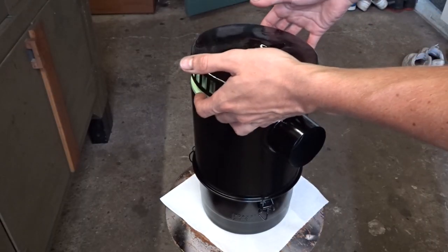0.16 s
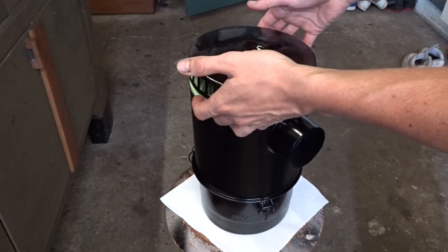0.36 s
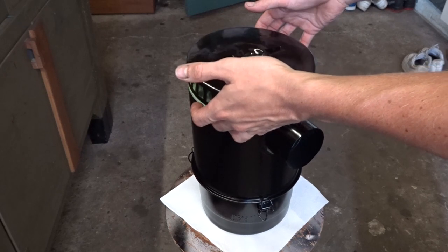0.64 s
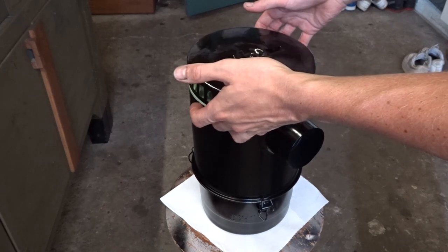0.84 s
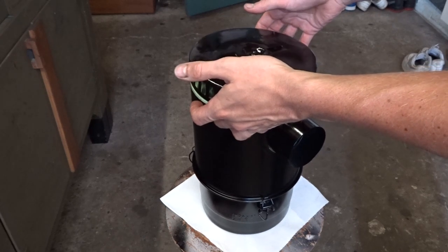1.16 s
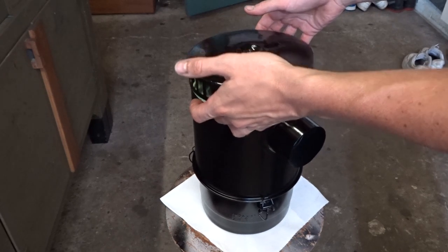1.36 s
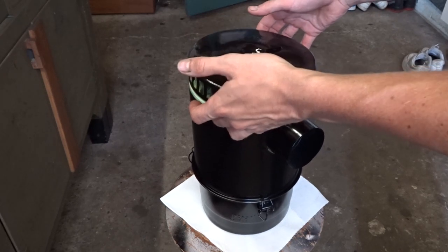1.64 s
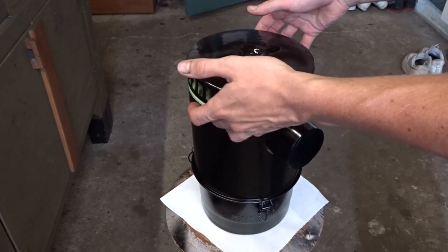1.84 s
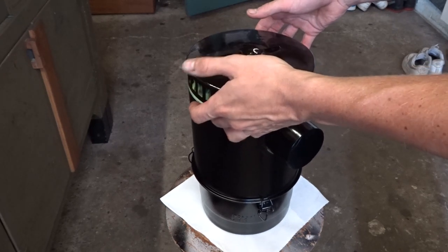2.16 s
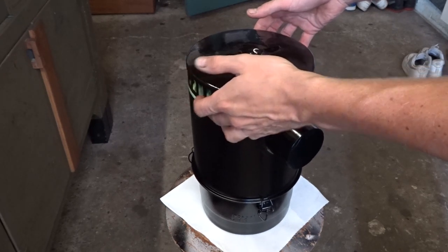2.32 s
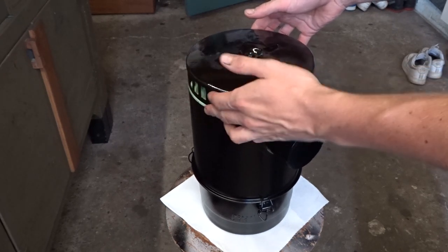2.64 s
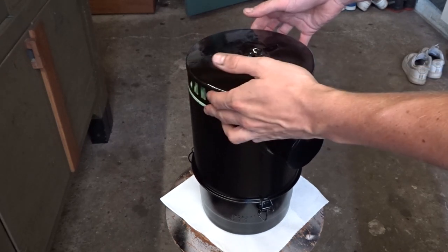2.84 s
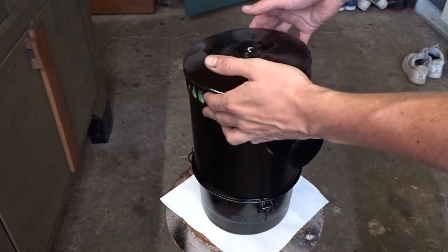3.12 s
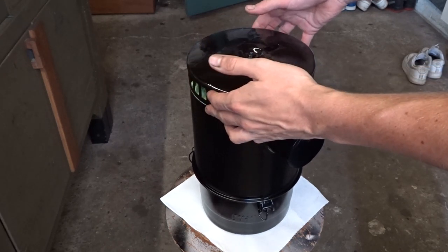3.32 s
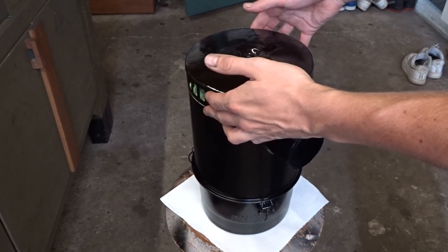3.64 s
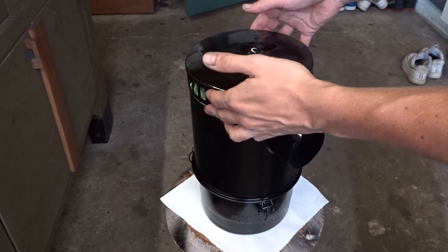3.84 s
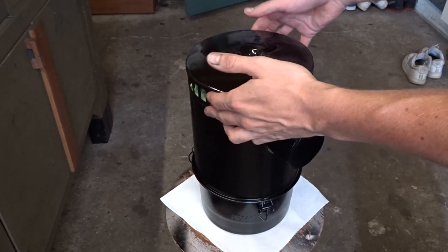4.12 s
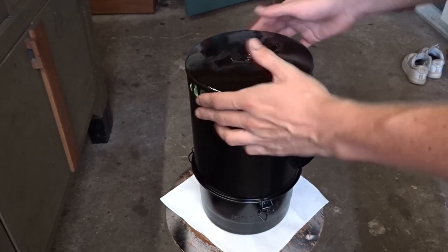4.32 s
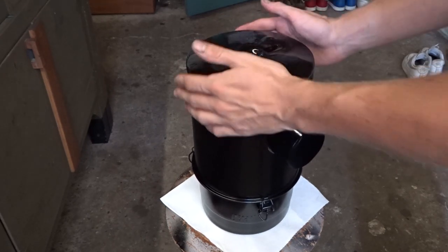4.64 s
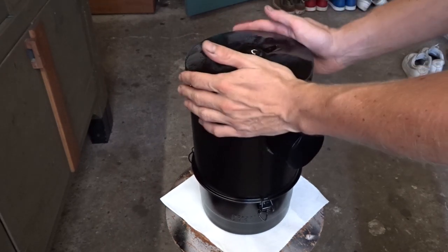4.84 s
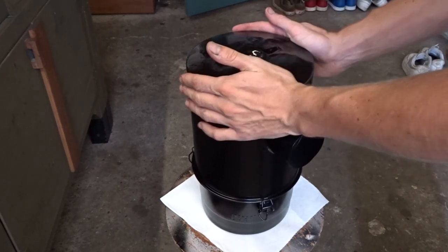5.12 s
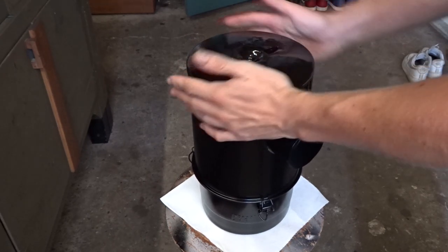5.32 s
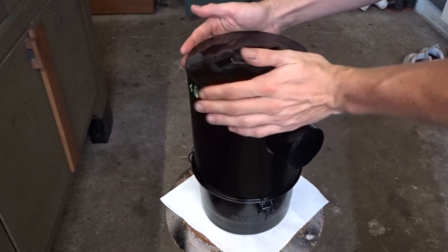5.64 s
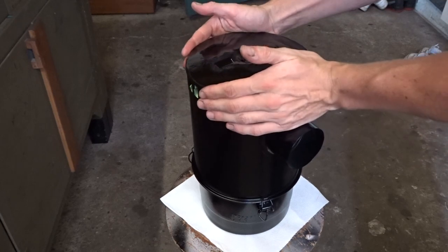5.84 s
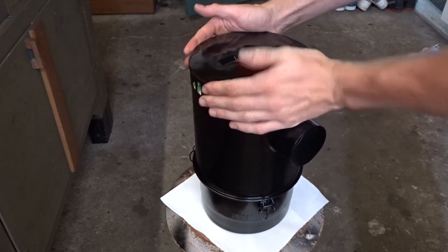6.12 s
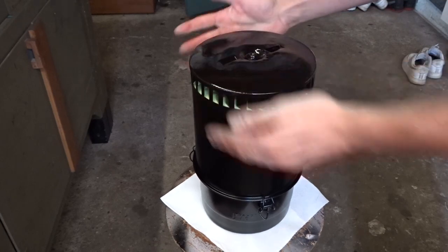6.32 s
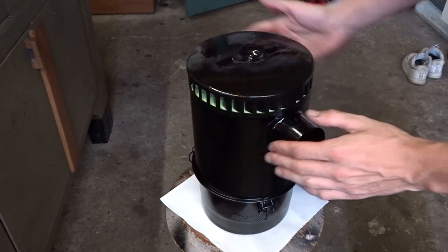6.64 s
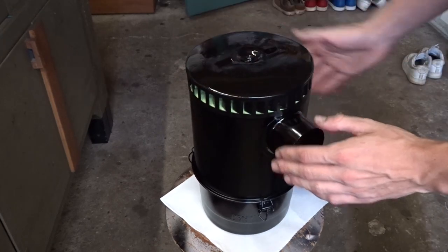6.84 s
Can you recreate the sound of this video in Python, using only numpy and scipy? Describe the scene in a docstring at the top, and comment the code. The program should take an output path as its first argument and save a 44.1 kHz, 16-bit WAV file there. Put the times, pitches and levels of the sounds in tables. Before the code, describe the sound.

In a small workshop, close in stereo, a steel lid is pressed onto a canister: one hard clank, then a louder double clang with a singing, quickly smothered ring. A car's roar outside fades away. A softer clank and small clicks follow, then light fingertip taps, a palm pat and skin rubbing on painted steel, over hiss and a faint clock tick.

```python
"""Small workshop: two hands press a sheet-steel lid onto a steel canister, with loud clanks and fainter late ones.
Clanks sum decaying modes, shell noise and a stool thump; the flexing lid adds swelling rough tones and pings.
Fingers tap and skin slides over the paint: shaped noise. A wall clock ticks about once a second, as noise bands.
Outside, a car's roar surges and fades, over room hiss and a ventilation drone.
The recorder's gain control ducks peaks above full scale and recovers slowly."""
import sys
import numpy as np
from scipy import signal
from scipy.fft import rfft, irfft, next_fast_len
from scipy.io import wavfile
from scipy.ndimage import uniform_filter1d, minimum_filter1d

SR = 44100
rng = np.random.default_rng(int(sys.argv[2]) if len(sys.argv) > 2 else 0)


def store_wav(level_fs):
    """Save 16-bit WAV to argv[1]."""
    pcm = np.round(np.clip(np.atleast_2d(level_fs), -1, 1) * 32767)
    wavfile.write(sys.argv[1], SR, pcm.T.astype(np.int16))


N = 307369
T = np.arange(N) / SR


def from_db(db):
    """Decibels to gain."""
    return 10 ** (np.asarray(db) / 20)


def rms_one(x):
    """Scale to unit power."""
    return x / np.sqrt(np.mean(x ** 2) + 1e-20)


def at_hz(points, hz):
    """Read a table on a log-frequency axis."""
    points = np.array(points)
    return np.interp(np.log(np.maximum(hz, 1)), np.log(points[:, 0]), points[:, 1])


def add(out, start_s, sound):
    """Mix a sound in at start_s, trimmed to the scene."""
    at = round(start_s * SR)
    out[:, max(at, 0):at + sound.shape[-1]] += sound[..., max(-at, 0):N - at]


def low_pass(x, hz, order=2):
    """Causal low-pass."""
    return signal.sosfilt(signal.butter(order, min(hz, .45 * SR), fs=SR, output="sos"), x)


def radiate(x, hz):
    """High-pass: a small body radiates little bass."""
    return signal.sosfilt(signal.butter(2, hz, "high", fs=SR, output="sos"), x)


def hump(hz, width_hz):
    """Gain curve of one resonance."""
    return lambda f: 1 / np.sqrt(1 + ((f * f - hz * hz) / (f * width_hz + 1e-9)) ** 2)


def wobble(size, hz):
    """Low-passed random motion of unit power, cut-off hz."""
    return rms_one(low_pass(rng.standard_normal(size), hz))


def stroke(t, rise_s, fall_s):
    """Envelope that swells up to time zero and then dies away."""
    return np.exp(-.5 * (np.minimum(t, 0) / rise_s) ** 2 - np.maximum(t, 0) / fall_s)


# left-right likeness of diffuse and of near sounds: freq_hz, likeness (0-1)
DIFFUSE_LIKENESS = [(50, .6), (300, 0.6), (1000, 0.4), (2500, 0), (4500, 0), (9000, 0)]
NEAR_LIKENESS = [(50, .7), (200, 1), (600, 0.8), (1500, 0.71), (2600, 0.65), (4500, 0.15), (8000, 0)]


def noise(size, colour, likeness):
    """Stereo noise of unit power with a given gain curve and left-right likeness."""
    padded = next_fast_len(size)
    f = np.arange(padded // 2 + 1) * SR / padded
    mid, side = rfft(rng.standard_normal((2, padded)))
    alike = np.clip(at_hz(likeness, f), 0, 1)
    both = np.sqrt(1 + alike) * mid + np.sqrt(1 - alike) * side * [[1], [-1]]
    return rms_one(irfft(both * colour(f), padded)[:, :size])


# surges of the car's roar: peak_s, level_db
CAR_SURGES = [(.2, 2), (.46, 4), (1.27, 2)]
SURGE_S = 0.074
CAR_DB, CAR_LEAVES_S, CAR_RECEDE_S = -42.5, 1.685, 0.29
CAR_FALLOFF = 0.98  # exponent of distance


def car_gain():
    """The roar surges a few times; from CAR_LEAVES_S it falls with distance."""
    distance = np.hypot(1, np.maximum(T - CAR_LEAVES_S, 0) / CAR_RECEDE_S)
    surges_db = sum(db * np.exp(-((T - s) / SURGE_S) ** 2) for s, db in CAR_SURGES)
    return from_db(CAR_DB + surges_db) / distance ** CAR_FALLOFF


# tyre roar spectrum: freq_hz, relative_level_db_per_hz
TYRE_SPECTRUM = [(35, -74), (60, -42), (128, -43.5), (315, -15.5), (349, -22), (387, -10), (547, -15),
                 (808, -5), (1030, 0.5), (1320, -6), (1590, -2.5), (1790, -10), (3670, -31), (8000, -50),
                 (10400, -68), (17600, -120)]


def tyre_roar(sway_db=-0.5, nearest_s=0.55, turn_s=.25, split_hz=1100):
    """Tyre noise, brighter as the car nears and duller as it leaves."""
    tyres = noise(N, lambda f: from_db(at_hz(TYRE_SPECTRUM, f)), NEAR_LIKENESS)
    dull = low_pass(tyres, split_hz, order=1)
    sway = from_db(sway_db * np.tanh((T - nearest_s) / turn_s))
    return car_gain() * (dull / sway + (tyres - dull) * sway)


def engine(level_db=-76, hz=160, passing_s=1.65, passage_s=0.22):
    """Narrow low noise from the car, strongest at passing_s."""
    hum = noise(N, lambda f: hump(hz, 50)(f) ** 2, NEAR_LIKENESS)
    return from_db(level_db) * hum / np.hypot(1, (T - passing_s) / passage_s)


# room hiss spectrum: freq_hz, relative_level_db_per_hz
AIR_SPECTRUM = [(15, -75.5), (25, -29.5), (85, -30), (122, -33.5), (156, -23.5), (227, -19.5), (281, -25.5),
                (313, -10.5), (389, -6.5), (567, -19), (1050, -11.5), (1450, -7.5), (2230, -6),
                (3440, -13.5), (6550, -16), (12000, -21.5), (15500, -27.5)]


def room_air(level_db=-55.0):
    """Steady coloured hiss of the room."""
    return from_db(level_db) * noise(N, lambda f: from_db(at_hz(AIR_SPECTRUM, f)), DIFFUSE_LIKENESS)


def ventilation(level_db=-71, hz=385):
    """Faint drone: steady noise through one resonance."""
    return from_db(level_db) * noise(N, lambda f: hump(hz, 70)(f) ** 2, NEAR_LIKENESS)


# canister modes: freq_hz, level_db (before focus), free_t60_s
CANISTER_MODES = [(491, -18, 0.55), (551.2, -4.5, 0.38), (660, -22, 0.74), (745, -15, 0.15),
                  (893, -15.5, 0.31), (990, -7.5, 0.51), (1088, -0.1, 0.42), (1143, -10, 0.3),
                  (1196, -20, 0.15), (1359, -19, 0.2), (1374, -21.5, 0.6), (1544, -12, 0.89),
                  (1510, -11.5, 0.39), (1640, -12, 0.47), (1774, -12, 0.45), (1816, -20, 0.38),
                  (1765, -28.5, 0.13), (2310, -17.5, .25), (2490, -9, 0.2), (2450, -26.5, 0.36),
                  (2366, -29.5, 0.24), (2780, -17.5, 0.069), (2870, -23, 0.15), (3176, -18, 0.2),
                  (3500, -32.5, .24), (3780, -31.5, .24), (4170, -22, 0.16), (5820, -36, .3)]


def damped_body(f, width_hz):
    """Gain curve of the canister's modes at one common width, with their levels left out."""
    return np.sqrt(sum(hump(hz, width_hz)(f) ** 2 for hz, db, t60 in CANISTER_MODES))


# skin sliding over the paint: peak_s, level_db, rise_s, centre_hz
RUBS = [(0.03, -55.5, 0.045, 4500), (5.021, -55, 0.058, 1550), (5.34, -55.5, .035, 1880),
        (5.905, -53, 0.014, 1920), (6.24, -48, 0.054, 1700), (6.772, -45, 0.032, 3800),
        (6.94, -56.5, 0.048, 1460)]
RUB_FALL_S = 0.084
GRIT_PER_S, GRIT_DB = 44, 6  # mean rate of catches; level against the stroke


def rubs(width=1.0, grain_db=1.5, grain_hz=200, grit_s=0.0035, damping_hz=40):
    """Skin sticks and slips in tiny grains under each stroke; random catches tick on the damped canister."""
    out, t = np.zeros((2, N)), T[:SR] - 1 / 4
    for peak_s, level_db, rise_s, hz in RUBS:
        grain = from_db(grain_db * wobble(len(t), grain_hz))
        slide = grain * noise(len(t), lambda f: hump(hz, width * hz)(f) ** 2, NEAR_LIKENESS)
        hits = (rng.random(len(t)) < GRIT_PER_S / SR) + 1e-18
        catches = signal.lfilter([1], [1, -np.exp(-1 / (grit_s * SR))], hits)
        body = noise(len(t), lambda f: hump(hz, width * hz)(f) * damped_body(f, damping_hz), NEAR_LIKENESS)
        rub = slide + from_db(GRIT_DB) * catches * body
        add(out, peak_s + t[0], from_db(level_db) * stroke(t, rise_s, RUB_FALL_S) * rub)
    return radiate(out, 250)


# clock case resonances: freq_hz, width_hz (before the 1.27 power), level_db, lateness_s
CLOCK_CASE = [(896, 45, -11, 0.022), (2120, 1600, -8.5, 0.0068), (2323, 160, -10.5, 0.0018),
              (3105, 130, -7, 0.0011), (4400, 740, -17.5, 0.0013), (5350, 360, -15, 0),
              (8000, 2800, -19.5, 0.00054)]
FIRST_TICK_S, TICK_PERIOD_S, TICK_DB = .629, .9987, -42


def clock(rise_s=0.014, fall_s=0.072, settle_s=0.087, settle_db=-9):
    """A distant tick, smeared by the room; the second hand settles just after each step."""
    out, t = np.zeros((2, N)), T[:SR * 2 // 3] - 1 / 20
    for tick_s in np.arange(FIRST_TICK_S, T[-1], TICK_PERIOD_S):
        for hz, width_hz, case_db, late_s in CLOCK_CASE:
            step = stroke(t - late_s, rise_s, fall_s)
            settle = stroke(t - late_s - settle_s, rise_s, fall_s)
            level = from_db(TICK_DB + case_db) * np.hypot(step, from_db(settle_db) * settle)
            case = noise(len(t), lambda f: hump(hz, width_hz)(f) ** 1.27, NEAR_LIKENESS)
            add(out, tick_s + t[0], level * case)
    return out


# dense small shell modes: freq_hz, relative_level_db_per_hz
CLATTER_SPECTRUM = [(100, -44.5), (300, -19.5), (430, -15.5), (520, -2), (620, -11.5), (800, -9), (1000, 0),
                    (1800, 3.5), (2080, -5.5), (2450, -4.5), (3000, -15.5), (3600, -15.5), (4300, -14),
                    (5000, -23), (6000, -17), (8000, -28.5), (15000, -40)]
# their free decay: freq_hz, t60_s
CLATTER_DECAY = [(150, 1), (500, 0.44), (1500, 0.46), (2700, 0.31), (7000, 0.51), (15000, 0.44)]


def shell_clatter(t, length, valley=0.4, cluster_hz=35):
    """Countless small modes crowd round the main ones: noise with a separate decay in each octave."""
    def colour(f):
        return from_db(at_hz(CLATTER_SPECTRUM, f)) * np.hypot(valley, damped_body(f, cluster_hz))

    spectrum = rfft(noise(len(t), colour, NEAR_LIKENESS))
    f = np.arange(spectrum.shape[1]) * SR / len(t)
    octave = np.log2(np.clip(f, 125, 16000) / 125)
    out = 0
    for k in range(8):
        band = irfft(spectrum * np.maximum(1 - abs(octave - k), 0), len(t))
        t60_s = at_hz(CLATTER_DECAY, 125 * 2 ** k) * length
        out = out + band * from_db(-60 * t / t60_s)
    return out


EDGE_RING_DB, CENTRE_RING_DB = -18.5, 4.5  # ringing modes against the clatter
EDGE_FOCUS, CENTRE_FOCUS = .6, 1.5  # a central blow favours the strongest modes
CHOKE_AFTER_S, CHOKE_DB_PER_S = 0.15, 76  # the palms close on the steel and smother it
EAR_PHASE_RAD = .18  # at 1400 Hz, before the random skew


def mode_ring(t, clatter_db, centred, length, scatter_db=1.24, grip=1.43):
    """Decaying sine modes; the hands press ever more firmly, so the ring dies faster as it goes."""
    hz, mode_db, t60_s = np.transpose(CANISTER_MODES)[:, :, None]
    signs = (-1) ** np.arange(len(CANISTER_MODES))[:, None]
    ring_db = clatter_db + EDGE_RING_DB + centred * (CENTRE_RING_DB - EDGE_RING_DB)
    focus = EDGE_FOCUS + centred * (CENTRE_FOCUS - EDGE_FOCUS)
    strength, skew = rng.standard_normal((2, len(CANISTER_MODES), 1))
    start_db = ring_db + focus * mode_db + scatter_db * strength
    choke_db = CHOKE_DB_PER_S * np.maximum(t - CHOKE_AFTER_S, 0)
    fade = signs * from_db(start_db - 60 * (t / (t60_s * length)) ** grip - choke_db)
    # higher modes reach the two ears further out of step
    phase = EAR_PHASE_RAD * np.tanh(skew) * np.sqrt(hz / 1400)
    return np.array([(fade * np.sin(2 * np.pi * hz * t + side * phase)).sum(0) for side in (1, -1)])


def stool_thump(t, thump_hz=158, thump_s=0.1):
    """The stool beneath answers with low noise: a thump and a deeper shudder."""
    thump = noise(len(t), lambda f: hump(thump_hz, 40)(f) ** 2, NEAR_LIKENESS) * np.exp(-t / thump_s)
    shudder = from_db(-6) * noise(len(t), hump(45, 70), DIFFUSE_LIKENESS) * np.exp(-t / 0.054)
    return (thump + shudder) * -np.expm1(-t / 0.045)


# lid snaps on the rim: start_s, level_db, centredness (0 edge, 1 middle), contact_cutoff_hz,
# ring_length (multiplies the free t60)
CLANKS = [(0.6291, -14, 0.71, 2700, 0.45), (0.640, -22.5, .4, 2500, 1.3), (1.343, -11.5, 0.67, 8076, 0.61),
          (1.366, -11.5, 0.44, 7000, 0.76), (1.433, -10.5, 0.12, 3000, 0.94),
          (1.673, -23.5, 0.31, 800, .35), (3.158, -19, 0.89, 3800, 1.14), (3.216, -30.5, 0.66, 2330, 0.98),
          (3.322, -32.5, 0.085, 800, .35), (3.8135, -35.5, .3, 1210, 0.58), (3.920, -32.5, 0, 9100, 0.91),
          (4.020, -41, 0, 2660, 1.02)]
THUMP_DB = -47.5  # stool against the clatter
RIM_HZ, RIM_DB, RIM_T60_S, SOFT_CONTACT_HZ = 682, -5.5, 0.15, 800  # soft edge blows wake a low rim mode
EDGE_BASS_HZ, CENTRE_BASS_HZ = 910, 229  # an edge blow moves less steel, so its bass ends higher up


def clanks(crack_db=-19, crack_s=0.0045):
    """Each snap rings modes and rim, rattles the shell and thumps the stool; where it lands sets the balance."""
    out, t = np.zeros((2, N)), T[:SR * 4 // 7]
    for start_s, clatter_db, centred, contact_hz, length in CLANKS:
        ring = mode_ring(t, clatter_db, centred, length)
        crack = from_db(crack_db) * noise(len(t), hump(3500, 4000), NEAR_LIKENESS) * np.exp(-t / crack_s)
        rattle = from_db(clatter_db) * (shell_clatter(t, length) + crack)
        steel = (ring + rattle) * -np.expm1(-t / 0.00029)
        stool = from_db(clatter_db + THUMP_DB) * stool_thump(t)
        rim_gain = (1 - centred) * SOFT_CONTACT_HZ / contact_hz
        rim_fade = from_db(clatter_db + RIM_DB - 60 * t / RIM_T60_S)
        rim = rim_gain * rim_fade * np.sin(2 * np.pi * RIM_HZ * t)
        bass_hz = EDGE_BASS_HZ * (CENTRE_BASS_HZ / EDGE_BASS_HZ) ** centred
        steel = radiate(low_pass(steel, contact_hz, order=1), bass_hz)
        add(out, start_s, steel + radiate(rim, CENTRE_BASS_HZ) + stool)
    return out


def lid_tone(envelope, hz, waver_rad=.22, flutter_db=0.76):
    """Rough tone of the flexing lid: a sine with random phase and level."""
    size = len(envelope)
    phase = 2 * np.pi * hz * T[:size] + waver_rad * wobble(size, 72)
    level = envelope * from_db(flutter_db * wobble(size, 130))
    return level * np.sin(phase + np.array([[.2], [-.2]])) * from_db([[.4], [-.4]])


# snaps that flex the lid and set it singing: start_s, pitch_hz, level_db, first_swell_width_s, loss_per_beat_db
SONGS = [(0.632, 1546, -12.5, 0.012, 11), (1.343, 1729, 2, 0.0091, 15.5), (3.922, 1543, -33, .011, 6)]
FIRST_SWELL_S, BEAT_S = .0065, 0.0516  # close modes beat, so the tone comes in swells
FIRST_SWELL_DB = -1.66  # against the second, which is the strongest
OVERTONE_RATIO, OVERTONE_DB, OVERTONE_T60_S = 1.605, -23, .38


def lid_song(count=4, broadening=0.37, attack_s=0.0016):
    """The lid sings in swells, one a beat and each broader than the last, under a plainly dying overtone."""
    out, t = np.zeros((2, N)), T[:SR // 2]
    for start_s, hz, level_db, swell_s, loss_db in SONGS:
        swells = 0
        for k in range(count):
            u = (t - FIRST_SWELL_S - k * BEAT_S) / (swell_s * (1 + k) ** broadening)
            swell_db = -loss_db * (k - 1) if k else FIRST_SWELL_DB
            swells = swells + from_db(swell_db) * np.exp(-u ** 2)
        overtone = from_db(OVERTONE_DB - 60 * t / OVERTONE_T60_S)
        tones = lid_tone(swells, hz) + lid_tone(overtone, OVERTONE_RATIO * hz)
        add(out, start_s, from_db(level_db) * tones * -np.expm1(-t / attack_s))
    return out


def workshop(x, t60_s=0.44, gap_s=0.0082):
    """Diffuse reflections from walls and benches: convolution with decaying noise."""
    t = T[:SR * 2 // 3]
    tail = noise(len(t), hump(1400, 5000), NEAR_LIKENESS) * from_db(-60 * t / t60_s) * (t > gap_s)
    return signal.fftconvolve(x, tail / np.sqrt(np.sum(tail ** 2) / 2), axes=1)[:, :N]


# lid shifting under pressure: peak_s, level_db
PINGS = [(1.4383, -4), (2.265, -40), (2.545, -30.5), (3.019, -44)]
PING_HZ, PING_S = 1793, 0.0044


def pings():
    """Single short swells of the lid's tone."""
    out, t = np.zeros((2, N)), T[:SR // 5] - 1 / 20
    for peak_s, level_db in PINGS:
        add(out, peak_s + t[0], lid_tone(from_db(level_db) * np.exp(-(t / PING_S) ** 2), PING_HZ))
    return out


# fingertips on the steel: start_s, level_db, centre_hz
TAPS = [(4.238, -42, 1900), (4.959, -41, 1800), (5.293, -44, 1690), (5.374, -42, 2000),
        (5.906, -32.5, 2500), (6.007, -43, 2500), (6.132, -40.5, 2030), (6.186, -44, 1800),
        (6.249, -39, 1710), (6.746, -36, 3370)]
TAP_ATTACK_S = .0005


def taps(width=0.63, fall_s=0.0028, tail_db=-15, tail_s=0.025, damping_hz=40):
    """Short noise knocks on the damped canister, with a faint room tail."""
    out, t = np.zeros((2, N)), T[:SR // 3]
    decay = np.exp(-t / fall_s) + from_db(tail_db) * np.exp(-t / tail_s)
    envelope = decay * -np.expm1(-t / TAP_ATTACK_S)
    for start_s, level_db, hz in TAPS:
        def colour(f):
            return hump(hz, 2 * width * hz)(f) ** 2 * damped_body(f, damping_hz)

        add(out, start_s, from_db(level_db) * noise(len(t), colour, NEAR_LIKENESS) * envelope)
    return radiate(out, 450)


# palm on the canister, spectrum: freq_hz, relative_level_db_per_hz
PAT_SPECTRUM = [(50, -48), (150, -35), (300, -16), (540, 0), (800, -8), (1200, -5.5), (1800, -2),
                (2800, -9), (4500, -16.5), (12000, -31.5)]
PAT_S, PAT_DB, PAT_RISE_S, PAT_FALL_S = 5.712, -38.5, 0.015, 0.072


def pat(grain_db=1.5, grain_hz=200):
    """A palm lands flat: a soft, broad, grainy slap of noise."""
    out, t = np.zeros((2, N)), T[:SR] - 1 / 4
    grain = from_db(grain_db * wobble(len(t), grain_hz))
    skin = grain * noise(len(t), lambda f: from_db(at_hz(PAT_SPECTRUM, f)), NEAR_LIKENESS)
    add(out, PAT_S + t[0], from_db(PAT_DB) * stroke(t, PAT_RISE_S, PAT_FALL_S) * skin)
    return radiate(out, 200)


def scene():
    """Canister and hands close by, clock and street far off; the lid's tones also excite the room."""
    background = tyre_roar() + engine() + room_air() + ventilation()
    song = lid_song() + pings()
    hands = rubs() + taps() + pat()
    return background + hands + clock() + clanks() + song + from_db(-11) * workshop(song)


CUTOFF_HZ = 15700


def record(dry, limit_db=0.0, release_db_per_s=2.5):
    """Gain control pulls peaks down just ahead of time and lets go slowly; the top is cut."""
    over_db = np.maximum(20 * np.log10(np.abs(dry).max(0) + 1e-9) - min(limit_db, 0), 0)
    ahead_db = -minimum_filter1d(-over_db, size=160)  # samples
    duck_db = np.maximum.accumulate(ahead_db + release_db_per_s * T) - release_db_per_s * T
    held = dry * from_db(-uniform_filter1d(duck_db, size=160))
    return signal.sosfilt(signal.cheby2(24, 50, CUTOFF_HZ, fs=SR, output="sos"), held)


dry = scene()
out = record(dry)
store_wav(out)
```